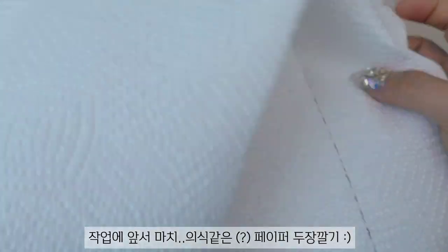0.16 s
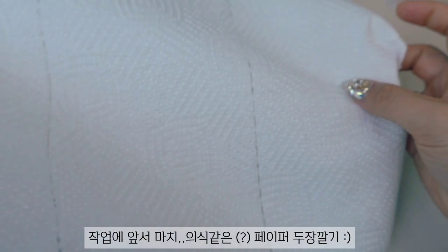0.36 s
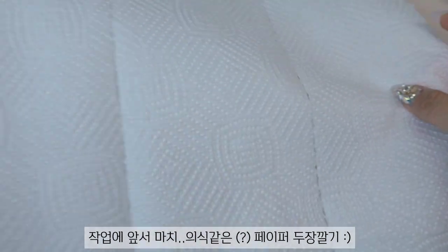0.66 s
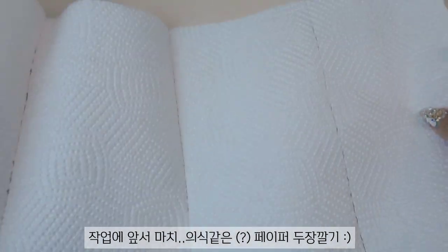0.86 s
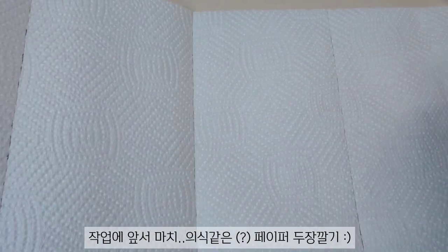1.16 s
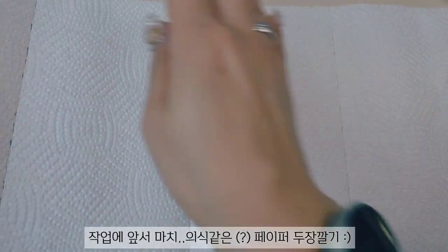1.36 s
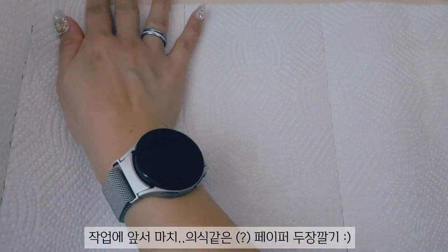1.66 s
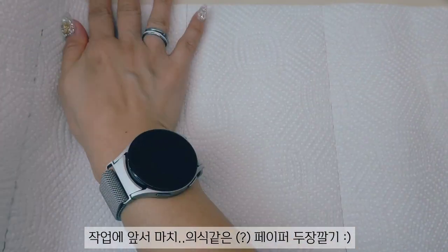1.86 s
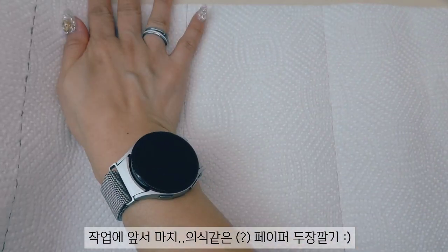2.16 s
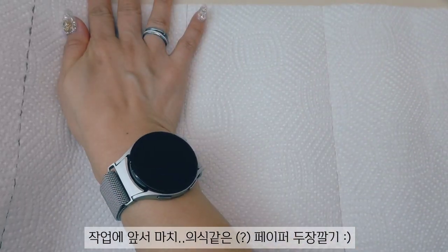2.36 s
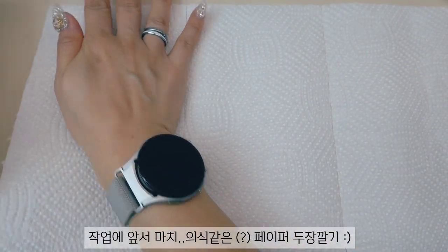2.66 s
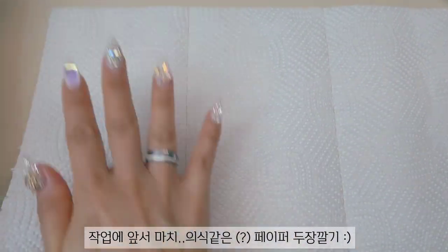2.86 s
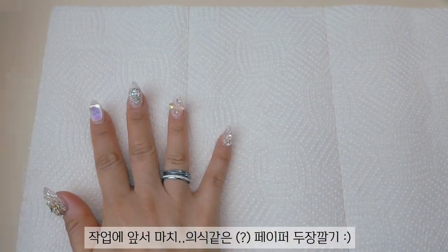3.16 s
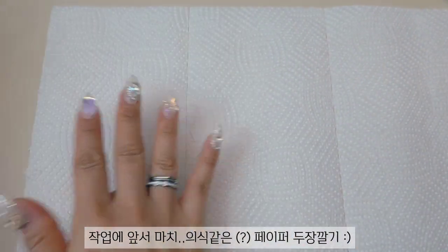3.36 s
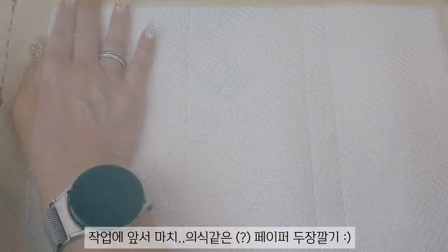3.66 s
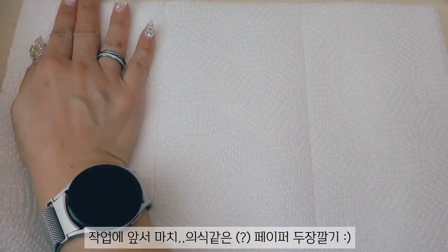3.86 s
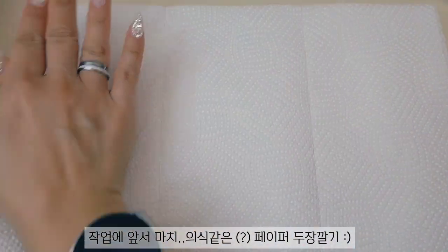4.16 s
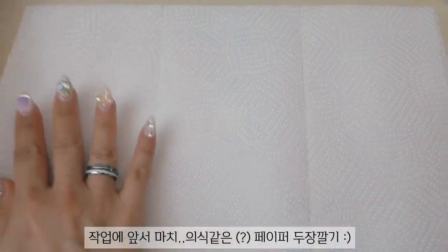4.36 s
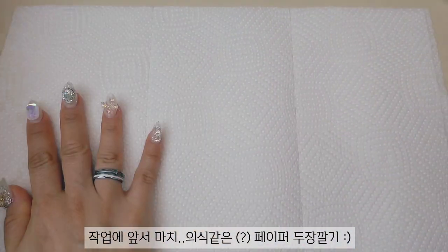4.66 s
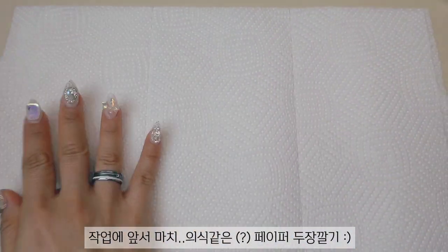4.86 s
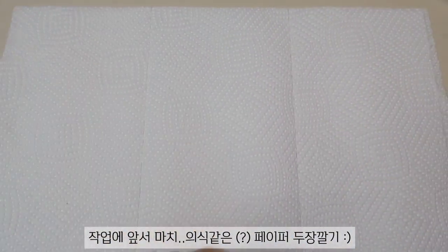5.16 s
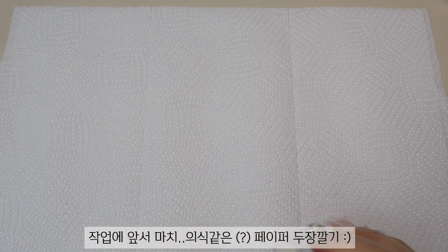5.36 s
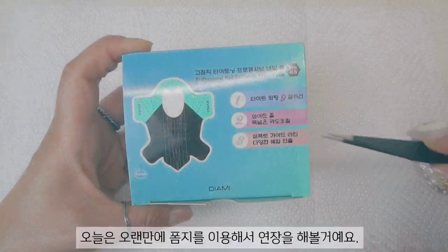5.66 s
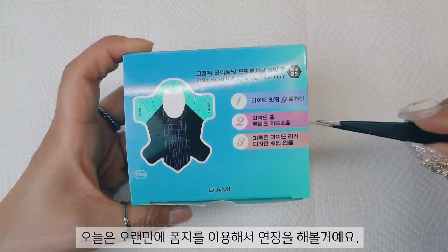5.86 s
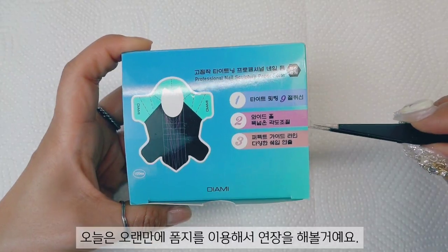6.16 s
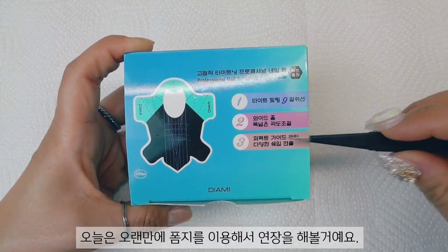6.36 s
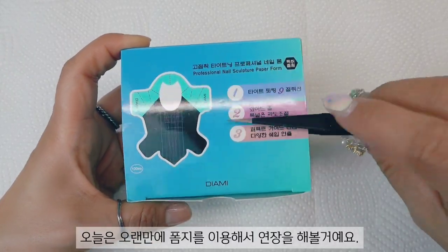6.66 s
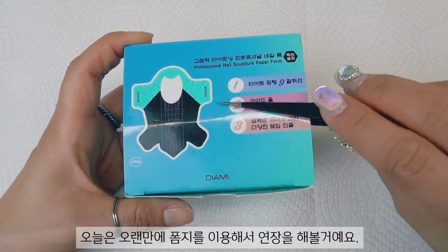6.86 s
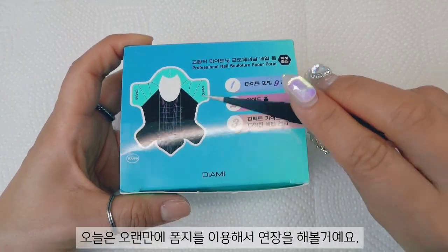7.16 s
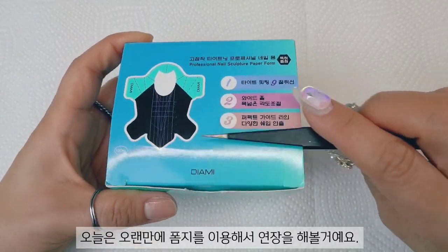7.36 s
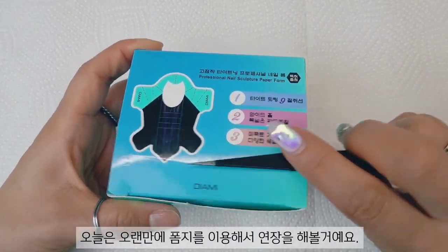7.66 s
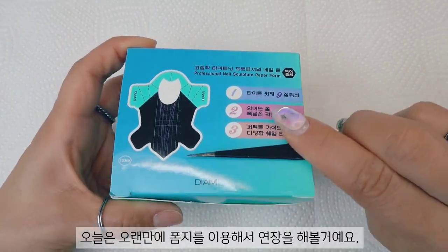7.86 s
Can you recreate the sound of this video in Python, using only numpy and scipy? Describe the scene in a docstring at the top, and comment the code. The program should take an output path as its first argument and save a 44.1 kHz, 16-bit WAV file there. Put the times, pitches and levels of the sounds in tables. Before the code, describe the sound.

A paper towel rustles and tears off the roll, then tweezers tap and scrape a small cardboard box until its lid pops.

```python
"""A paper towel rustles as it is unrolled over a table, close under a phone. A hand pins it and tears it:
sliding fibres hiss, and each tiny paper bridge of the perforation cracks and makes the tight sheet boom.
Then tweezers tap and scrape a small cardboard box, ringing its panels, until the lid pops.
All along, the desk rumbles under the arms and the roll, in a quiet room with a short echo."""
import sys
import numpy as np
from scipy import signal
from scipy.fft import rfft, irfft
from scipy.io import wavfile
from scipy.ndimage import uniform_filter1d, map_coordinates

SR = 44100
rng = np.random.default_rng(int(sys.argv[2]) if len(sys.argv) > 2 else 0)


def output_pcm(signal):
    """Save a mono or channel-first signal as 16-bit PCM at the path in sys.argv[1].

    Samples are clipped to [-1, 1] before scaling.
    """
    pcm = np.clip(np.atleast_2d(signal).T, -1, 1) * 32767
    wavfile.write(sys.argv[1], SR, np.round(pcm).astype(np.int16))


N = 353241

# pulls of the sheet: t/s at full strength, swell/s, hold/s, fade/s, boom/dB, crinkle/dB, hiss/dB
SHEET_SLIDES = [(0, 0.064, 0.018, .2, -47, -41, -44.5), (.118, 0.088, 0.0036, 0.24, -46, -33.5, -45),
                (.433, 0.049, 0.11, 0.03, -33.5, -31.5, -38),
                (.674, 0.27, 0.0086, 0.049, -45, -38.5, -47.5),
                (.83, 0.29, 0.011, 0.17, -38.5, -39.5, -51.5),
                (1.257, 0.11, 0.0017, 0.057, -46.5, -43.5, -55.5),
                (1.5, 0.1, 0.043, 0.12, -55.5, -53.5, -56), (1.928, 0.05, 0.22, 0.18, -53, -50, -53.5),
                (2.56, 0.012, 0.014, 0.078, -20.5, -27, -32.5), (2.635, .02, 0.082, 0.026, -30.5, -36, -35),
                (2.925, 0.036, .005, 0.28, -54, -62, -86),
                (3.112, 0.0073, 0.0097, 0.098, -39.5, -45.5, -53.5),
                (3.236, 0.01, 0.0042, 0.031, -28.5, -29.5, -34.5),
                (3.3, 0.29, 0.047, 0.1, -44.5, -50.5, -57.5), (3.42, 0.031, 0.0065, 0.056, -44, -64, -77),
                (3.55, 0.069, 0.12, .05, -56, -63.5, -79), (3.769, 0.086, 0.0065, 0.19, -43, -42, -44),
                (3.866, 0.0077, 0.007, 0.05, -22, -26, -31.5), (3.989, 0.057, 0.0035, 0.06, -50, -47, -63),
                (4.246, 0.17, 0.0057, 0.083, -73, -61, -75),
                (4.56, 0.071, 0.0091, 0.042, -66, -45.5, -52.5),
                (4.584, 0.01, 0.002, 0.042, -28, -65, -44.5), (4.67, 0.014, 0.097, 0.13, -43.5, -70, -62.5),
                (4.775, 0.017, 0.0047, 0.016, -50, -37.5, -42.5),
                (4.95, 0.084, 0.094, 0.062, -70, -63.5, -69.5),
                (5.39, 0.034, 0.063, 0.098, -66, -45.5, -47)]
# a handled sheet never lies quite still: t/s, boom/dB, crinkle/dB
SHEET_STIR = [(0, -39.5, -42), (.9, -50, -49), (1.1, -51, -52), (1.39, -65.5, -64.5), (1.86, -76, -68.5),
              (2.3, -68.5, -67.5), (2.5, -61.5, -64.5), (2.76, -37.5, -48.5), (2.9, -63.5, -62),
              (3.09, -70, -65), (3.4, -61, -58), (3.65, -56.5, -67), (3.95, -40, -71), (4.12, -81, -86),
              (4.47, -71.5, -92), (4.81, -46.5, -51.5), (4.9, -86, -71), (5.3, -83, -92), (5.8, -79.5, -73),
              (5.9, -93.5, -96)]
# the sheet's modes (pitches it likes to ring at): f/Hz, width/Hz, level/dB
SHEET_MODES = [(466.6, 12, -11), (722, 130, 1), (1110, 220, -14.5)]
# tone of the crinkling fibres: f/Hz, level/dB
FIBRE_TONE = [(600, -13.5), (1200, -4), (1800, -1), (3000, -3), (4500, -13), (7000, -29)]
# where the sheet is held: t/s, left minus right/dB
SHEET_PAN = [(0, 1), (.6, 3.5), (1.2, -2.5), (1.6, 9), (2.5, 2), (5.8, 8.5)]
# paper bridges snapping, fingers landing: t/s, crack/dB, boom/dB, fizz/dB
SNAPS = [(0.227, -25, -31, -50), (0.6233, -21, -53, -46), (0.832, -23, -22, -46), (1.03, -40, -52, -60),
         (2.5439, -12, -19.5, -15), (2.5556, -10, -20, -19.5), (2.5618, -11, -6.5, -25),
         (2.5704, -9.5, -17.5, -22.5), (2.5768, -15.5, -18, -30), (2.6295, -20, -14.5, -20.5),
         (2.6398, -18, -3.5, -23), (2.668, -8, -11, -25.5), (2.6865, -30, -7, -33), (2.7055, -23, -9, -25),
         (2.7228, -29, -9, -39), (2.9128, -63, -33, -69), (3.1085, -32, -22, -50),
         (3.1295, -40, -27.5, -42.5), (3.214, -9.5, -21, -15), (3.2305, -11.5, -16.5, -28),
         (3.2388, -16, -13, -29), (3.4191, -52, -32, -65), (3.7539, -28, -40.5, -45.5),
         (3.7727, -15.5, -28.5, -33.5), (3.804, -14.5, -24.5, -26.5), (3.8452, -12, -18, -15),
         (3.8624, -7.5, -8, -17.5), (3.8725, -17, -16, -31.5), (3.893, -26.5, -28, -29),
         (4.569, -20, -19, -27), (4.5845, -9, -19, -26), (4.6655, -9, -11, -27), (4.7112, -18.5, -9.5, -24),
         (4.7648, -41, -16, -32), (4.7717, -18, -18.5, -27), (4.7883, -40, -53, -31)]
# nails and edges brushing the sheet: t/s, level/dB, f/Hz, length/s
SWISHES = [(1.028, -43, 2200, 0.0075), (1.257, -33, 3620, 0.0085), (3.177, -42, 2840, 0.0021),
           (3.291, -37, 2870, 0.0036), (3.349, -44.5, 2800, 0.0035), (3.405, -49, 2050, 0.0058)]
# the desk shaking under arms and roll: t/s, deepest mode/dB, upper modes/dB
DESK_RUMBLE = [(0, -53, -51), (1, -57, -51.5), (1.6, -65, -61), (2.4, -59, -58.5), (3.5, -51.5, -52.5),
               (4.3, -70.5, -73.5), (4.7, -58, -44.5), (5.2, -68, -79), (5.5, -57.5, -61),
               (6.3, -67, -75.5), (8.01, -58, -55.5)]
# the desk's modes: f/Hz, width/Hz, level/dB
DESK_MODES = [(56, 24, -1), (86.9, 8.3, -5.5), (155, 56, -6), (209.2, 8.1, -1)]
# the desk rocking as an arm leans on it: t/s, level/dB, f/Hz, length/s
DESK_SWAYS = [(0.506, -41.5, 100, 0.025), (1.327, -40.5, 96.7, 0.048), (1.78, -49, 156, 0.033),
              (1.924, -45.5, 93.7, 0.086), (2.03, -45.5, 140.5, 0.056), (5.431, -43, 41.3, 0.086),
              (5.752, -51, 63.8, 0.12), (6.502, -52, 95.8, 0.072), (7.598, -44.5, 97.4, 0.046)]
# a hand dropping on the desk: t/s, level/dB
DESK_THUMPS = [(2.557, -25.5), (3.111, -20.5), (3.411, -30.5), (3.865, -30), (4.574, -31.5), (4.669, -38.5)]
# tone of the quiet room: f/Hz, level/dB
AIR_TONE = [(59, -36.5), (100, 5.5), (558, -14.5), (736, -1), (1580, -13.5), (2520, -12), (4020, -17.5),
            (13800, -20.5), (16000, -28)]
# tweezer taps and lid pops: t/s, crack/dB, hollow knock/dB, tick/dB, knock f/Hz
BOX_TAPS = [(5.9084, -36.5, -30, -34, 1010), (6.0089, -42.5, -35.5, -56, 950),
            (6.13, -37.5, -34.5, -56, 760), (6.3, -51.5, -50.5, -64, 600),
            (6.3136, -37.5, -30.5, -48, 1033), (6.385, -44.5, -55, -51, 990), (6.513, -27, -26.5, -42, 960),
            (6.72, -34, -28, -54, 860), (6.8514, -12.5, -27.5, -29, 1034), (6.8951, -34, -38, -23, 1010),
            (6.9059, -15, -28, -22, 1060), (7.0129, -34.5, -27.5, -37, 1010),
            (7.1876, -42.5, -34, -41, 950), (7.2374, -41, -26.5, -52, 500), (7.2463, -20.5, -39, -44, 1000),
            (7.2581, -23, -17, -20, 1003), (7.3204, -13.5, -23.5, -38, 1005),
            (7.4436, -12.5, -22.5, -26, 990), (7.5295, -3, -10, -7, 783), (7.826, -23, -27, -34, 455),
            (7.918, -5, -15.5, -4, 1023), (7.9962, -26, -32, -23, 1010)]
# the cardboard's modes: f/Hz, width/Hz, level/dB
BOX_MODES = [(394.6, 127, -5), (987, 143, -1), (1305, 65, -2.5), (1477, 99, -1), (1704, 93, 4),
             (2210, 420, -2), (2762, 437, -1.5), (3260, 420, 5.5), (3890, 120, 0.5), (4400, 630, 2),
             (5430, 260, -1), (6000, 520, -4), (7530, 400, -8.5)]
# tweezers and nails dragged over the box:
# t/s at full strength, swell/s, hold/s, fade/s, hollow/dB, panel/dB, rasp/dB, tip's bite/dB, bite f/Hz
BOX_DRAGS = [(6.316, 0.017, .005, 0.25, -56, -63, -71, -68, 1720),
             (6.474, 0.011, 0.12, 0.038, -42, -45.5, -53, -61, 4340),
             (6.532, 0.013, 0.19, 0.025, -44.5, -41, -44.5, -44, 6300),
             (6.777, 0.065, 0.0057, 0.056, -42.5, -49.5, -56, -47, 1510),
             (6.904, 0.046, .005, .1, -51, -67, -59, -70, 3300),
             (6.997, 0.07, .008, 0.017, -50.5, -45, -52.5, -48, 3060),
             (7.06, 0.082, 0.26, 0.11, -61.5, -60.5, -66, -69, 4740),
             (7.252, 0.033, 0.0044, 0.029, -35, -36, -42.5, -36.5, 2990),
             (7.319, 0.015, 0.021, 0.097, -40, -40, -50.5, -51, 2570),
             (7.403, 0.016, 0.016, .03, -42, -37, -47.5, -43, 3300),
             (7.447, 0.034, 0.013, 0.12, -31, -33.5, -34.5, -32.5, 1650),
             (7.537, 0.012, 0.0031, 0.019, -17.5, -17, -23.5, -21, 2240),
             (7.57, 0.024, 0.089, 0.024, -39.5, -38, -40.5, -48, 5760),
             (7.784, 0.054, 0.042, 0.012, -37.5, -25, -26, -37, 4400),
             (7.846, 0.022, 0.043, 0.031, -44, -47.5, -50.5, -54, 3080),
             (7.919, 0.013, .003, 0.083, -28.5, -42, -32.5, -28, 2150)]
# the steel tips, which sing only while dragged: f/Hz, width/Hz, level/dB
TIP_MODES = [(5840, 190, 11), (7700, 230, 4)]


def undb(db):
    return 10 ** (np.asarray(db) / 20)


def unit(x):
    """Scale a sound to an average power of 1."""
    return x / np.sqrt(np.mean(x ** 2))


def curve(table):
    """Join a table's rows with straight lines, giving one value a sample."""
    times, *columns = np.transpose(table)
    return [np.interp(np.arange(N) / SR, times, c) for c in columns]


def band(x, lo_hz, hi_hz, order=2):
    return signal.sosfilt(signal.butter(order, [lo_hz, hi_hz], "bandpass", fs=SR, output="sos"), x)


def ring(x, modes):
    """Ring several modes side by side, neighbours in opposite sign."""
    return sum((-1) ** k * undb(db) * signal.lfilter(*signal.iirpeak(hz, hz / width, SR), x)
               for k, (hz, width, db) in enumerate(modes))


def colour(x, tone):
    """Shape a sound's lows and highs to follow a tone table."""
    hz, db = np.transpose(tone)
    f = np.maximum(np.arange(N // 2 + 1) * SR / N, 1)
    gain = undb(np.interp(np.log(f), np.log(hz), db))
    return unit(irfft(rfft(x) * gain, N))


def wide(mid, side):
    """A spread-out sound: left and right share mid and differ by side."""
    return mid + side * np.array([[1], [-1]])


def stroke(at, swell, hold, fade):
    """One hand movement gains 20 dB per swell time, holds, then loses 20 dB per fade time."""
    t, gain = np.arange(N) / SR, np.zeros(N)
    near = slice(max(int((at - 5 * swell) * SR), 0), int((at + hold + 5 * fade) * SR))
    away = np.maximum((at - t[near]) / swell, 0) + np.maximum((t[near] - at - hold) / fade, 0)
    gain[near] = undb(-20 * away)
    return gain


def strokes(table):
    """Overlapping strokes add their power; one gain for each of three level columns."""
    return np.sqrt(sum((undb(row[4:7])[:, None] * stroke(*row[:4])) ** 2 for row in table))


def friction(per_s, scatter_db):
    """Rubbing makes tiny slips at random moments, a few much stronger than the rest, in patches."""
    slips = (rng.random(N) < per_s / SR) * rng.standard_normal(N)
    slips *= undb(scatter_db * rng.exponential(size=N))
    hold = int(SR / 70)
    patches = uniform_filter1d(np.repeat(rng.standard_normal(N // hold + 1), hold)[:N], hold // 2)
    return slips * undb(2.0 * patches)


def towel_rustle():
    """Slipping fibres crinkle, hiss and shake the whole sheet into a low boom."""
    boom_db, crinkle_db = curve(SHEET_STIR)
    stir = undb([boom_db, crinkle_db, crinkle_db - 7.5])
    boom_gain, crinkle_gain, hiss_gain = np.hypot(strokes(SHEET_SLIDES), stir)
    slips = friction(per_s=9000, scatter_db=1.0)
    boom = unit(unit(ring(slips, SHEET_MODES)) + undb(-4.0) * unit(band(slips, 295, 1400)))
    crinkle = wide(colour(slips, FIBRE_TONE), undb(-5.5) * unit(band(rng.standard_normal(N), 1400, 5600)))
    hiss = wide(unit(band(slips, 3900, 14000)), unit(band(rng.standard_normal(N), 3000, 19000)))
    return boom_gain * boom + crinkle_gain * crinkle + hiss_gain * hiss


def place(x, pan_db):
    """The nearer microphone hears a sound earlier, and louder because the phone shades the other."""
    lag_samples = 0.6 * pan_db
    shaded = band(x, 600, 4000, order=1)
    channels = []
    for whole, part, side in zip(x, shaded, (1, -1)):
        heard = whole + (undb(side * pan_db / 2) - 1) * part
        channels.append(map_coordinates(heard, [np.arange(N) + side * lag_samples / 2], order=3))
    return np.array(channels)


def desk_rumble():
    """Soft pushes keep the desk's slow modes swinging, and leaning arms rock it."""
    deep_db, upper_db = curve(DESK_RUMBLE)
    push = signal.sosfilt(signal.butter(3, 36, "highpass", fs=SR, output="sos"), rng.standard_normal(N))
    out = undb(deep_db) * unit(ring(push, DESK_MODES[:1]))
    out += undb(upper_db) * unit(band(ring(push, DESK_MODES[1:]), 95, 170))
    for at, db, hz, length in DESK_SWAYS:
        t = np.arange(N) / SR - at
        out += undb(db) * np.sin(2 * np.pi * hz * t) * np.exp(-.5 * (t / length) ** 2)
    return out


def room_air():
    """The quiet room has a faint, steady hush."""
    mid, side = (colour(rng.standard_normal(N), AIR_TONE) for _ in range(2))
    return undb(-66.5) * wide(mid, band(side, 2300, 18000))


def room_echo(dry, decay_s=0.13, level_db=-15):
    """A small furnished room answers briefly, nearly alike left and right in the bass."""
    t = np.arange(int(.3 * SR)) / SR
    mid, side = rng.standard_normal((2, len(t))) * undb(-60 * t / decay_s)
    mid, side = band(mid, 170, 6200), undb(-3) * band(side, 900, 7000)
    echo = wide(mid, side) * undb(level_db) / np.linalg.norm(mid)
    return signal.fftconvolve(dry.mean(axis=0)[None], echo, axes=1)[:, :N]


def blows(table, filters, scuff_s, click):
    """Each blow is a click and a dying scuff, heard through an object's middle, low and high parts."""
    size = 3072
    out, t = np.zeros((2, N + size)), np.arange(size) / SR
    noise = rng.standard_normal((len(table), 2, size))  # a mid and a side for each blow
    times, *peaks_db = np.transpose(table)
    for db, through, decay, side_db in zip(peaks_db, filters, scuff_s, (-14, -26, -3)):
        push = noise * np.exp(-t / decay)
        push[:, 0, 0] += click
        hits = through(push)
        hits *= (undb(db) / np.abs(hits[:, 0]).max(axis=1))[:, None, None]
        for i, (mid, side) in zip((times * SR).astype(int), hits):
            out[:, i:i + size] += wide(mid, undb(side_db) * side)
    return out[:, :N]


def towel_snaps():
    """A breaking paper bridge or a landing finger cracks and sets the tight sheet booming."""
    crack = lambda x: band(band(x, 750, 2800), 750, 3300)
    boom = lambda x: ring(x, SHEET_MODES) + undb(-0.5) * band(x, 300, 1234)
    fizz = lambda x: band(x, 3800, 13000)
    return blows(SNAPS, (crack, boom, fizz), scuff_s=(.0009, .0009, .0011), click=3.4)


def towel_swishes():
    """Nails and edges brush the sheet in short puffs of noise."""
    out, t = np.zeros(N), np.arange(N) / SR
    for at, db, hz, length in SWISHES:
        i, n = int((at - .05) * SR), int(.1 * SR)
        edges_hz = hz / 1.4, hz * 1.38
        brush = unit(band(band(rng.standard_normal(n), *edges_hz), *edges_hz))
        out[i:i + n] += undb(db) * brush * np.exp(-.5 * ((t[i:i + n] - at) / length) ** 2)
    return out


def desk_thumps():
    """A dropped hand strikes the desk's modes with one short, soft push."""
    out, t = np.zeros(N), np.arange(int(.4 * SR)) / SR
    palm = t * np.exp(-t / 0.00075)
    thud = band(ring(palm, DESK_MODES), 40, 400) + undb(-5.0) * band(palm, 67, 450)
    for at, db in DESK_THUMPS:
        out[int(at * SR):][:len(t)] += undb(db) * thud / np.abs(thud).max()
    return out


def box_taps():
    """Taps and lid pops ring the cardboard; each struck face knocks at its own pitch."""
    crack = lambda x: ring(x, BOX_MODES[2:7])
    knock = lambda x: np.array([ring(push, [BOX_MODES[0], (hz, 75, 4.0)])
                                for push, (*_, hz) in zip(x, BOX_TAPS)])
    tick = lambda x: ring(x, BOX_MODES[7:]) + undb(-21.0) * band(x, 2700, 19700)
    taps = [row[:4] for row in BOX_TAPS]
    return blows(taps, (crack, knock, tick), scuff_s=(.002, .002, .0016), click=0.78)


def rub(x, modes, wander_db=5, wander_per_s=25):
    """As the tip moves over the panels, each mode swells and sinks on its own."""
    hold, out = int(SR / wander_per_s), 0
    for k, (hz, width, db) in enumerate(modes):
        wander = uniform_filter1d(np.repeat(rng.standard_normal(N // 400), hold)[:N], hold)
        mode = [(hz, width, 0)]
        out += (-1) ** k * undb(db + wander_db * wander) * ring(ring(x, mode), mode)  # twice: sharper
    return unit(out)


def box_scrapes():
    """Dragged tips slip over the cardboard, ringing its panels and their own steel."""
    hollow_gain, panel_gain, rasp_gain = strokes(BOX_DRAGS)
    low, middle, high = BOX_MODES[:2], BOX_MODES[2:7], BOX_MODES[7:]
    slips, side = friction(per_s=9000, scatter_db=1.46), rng.standard_normal(N)
    panel = rub(slips, middle) + undb(-4.5) * unit(band(slips, 1340, 2900))
    panel = wide(panel, undb(-23) * unit(ring(side, middle)))
    steel = unit(ring(ring(slips, TIP_MODES), TIP_MODES))
    rasp = rub(slips, high) + undb(-12.5) * steel + undb(-7) * unit(band(slips, 2800, 11000))
    rasp = wide(rasp, undb(-8.0) * rub(side, high) + undb(-9) * unit(band(side, 2400, 12000)))
    out = hollow_gain * rub(slips, low) + panel_gain * panel + rasp_gain * rasp
    for *drag, bite_db, hz in BOX_DRAGS:
        bite = unit(band(slips, hz / 1.06, hz * 1.06))
        out += undb(bite_db) * stroke(*drag[:4]) * bite
    return out


def scene():
    """The towel and the box echo in the room; the desk and the hush lie underneath."""
    towel = place(towel_rustle() + towel_swishes() + towel_snaps(), curve(SHEET_PAN)[0])
    dry = towel + box_scrapes() + box_taps()
    return dry + room_air() + room_echo(dry) + desk_rumble() + desk_thumps()


def record(dry, ceiling=.9, top_hz=15900):
    """The phone rounds off the loudest peaks and cuts the highest treble."""
    rounded = dry / (1 + (np.abs(dry) / ceiling) ** 4) ** .25
    return signal.sosfilt(signal.ellip(8, .2, 80, top_hz, fs=SR, output="sos"), rounded)


dry = scene()
out = record(dry)
output_pcm(out)
```